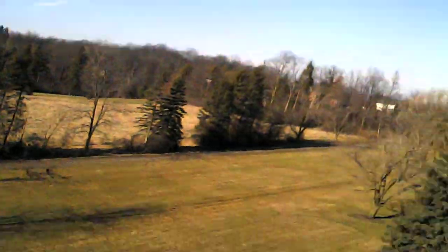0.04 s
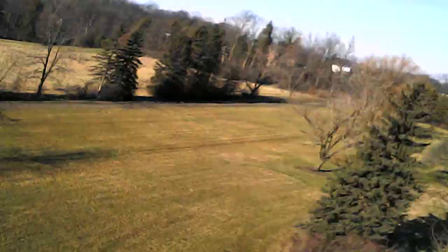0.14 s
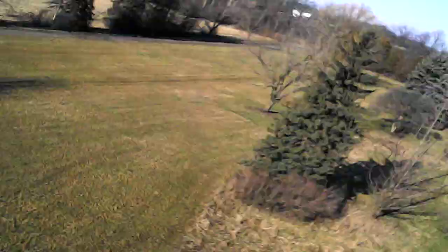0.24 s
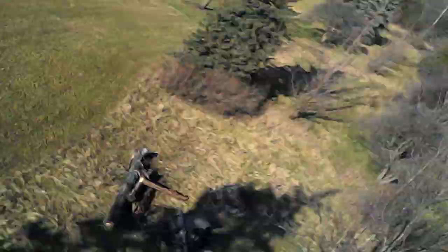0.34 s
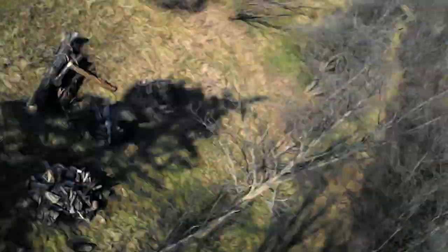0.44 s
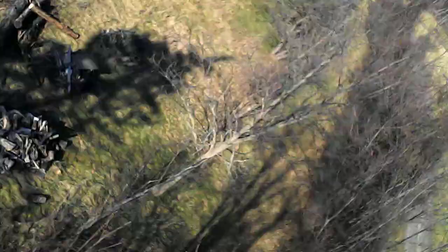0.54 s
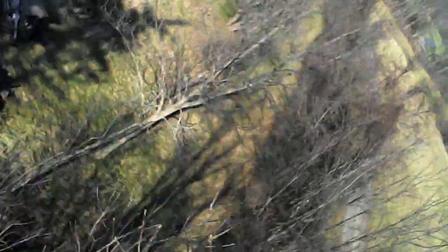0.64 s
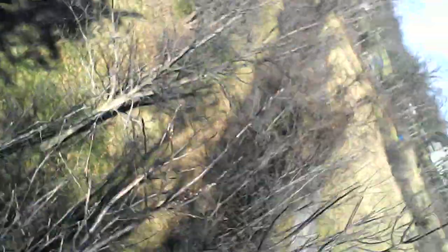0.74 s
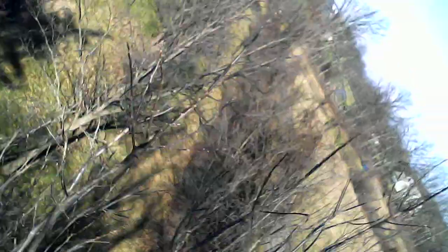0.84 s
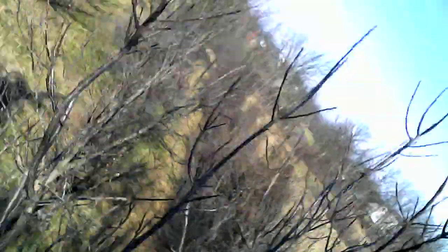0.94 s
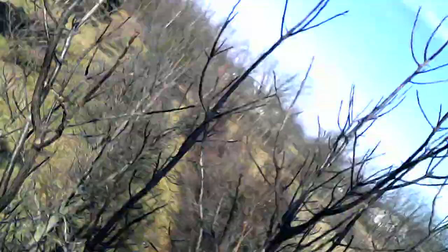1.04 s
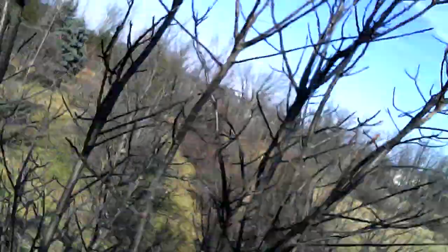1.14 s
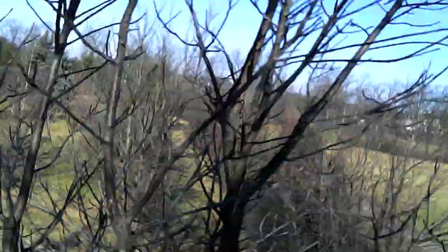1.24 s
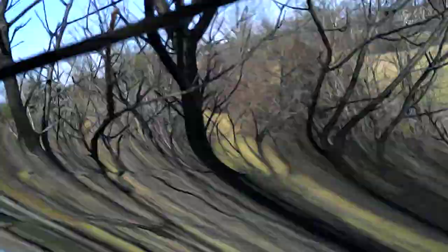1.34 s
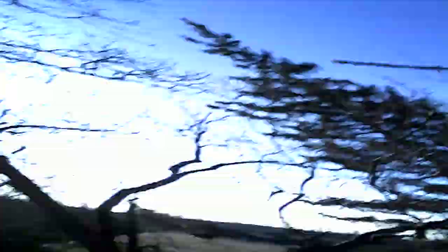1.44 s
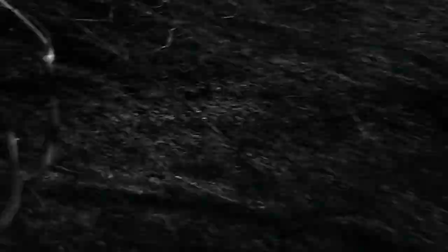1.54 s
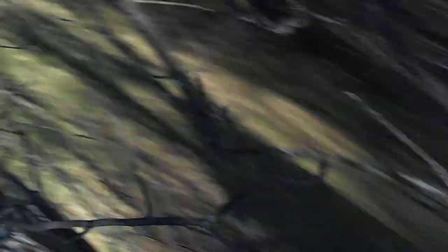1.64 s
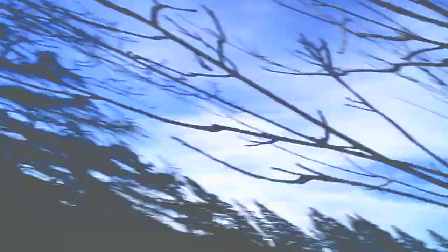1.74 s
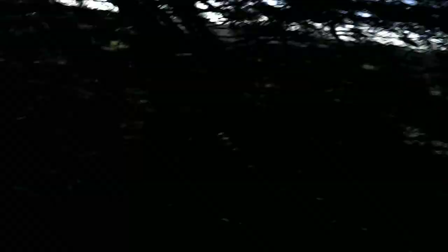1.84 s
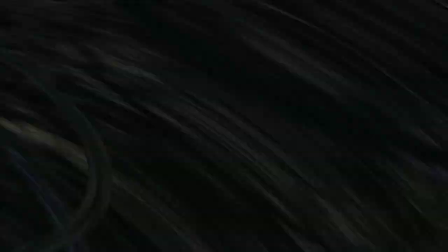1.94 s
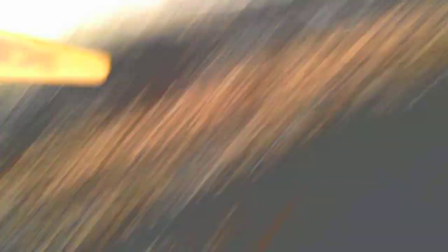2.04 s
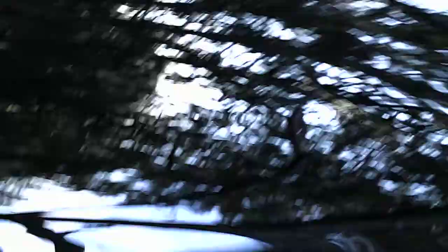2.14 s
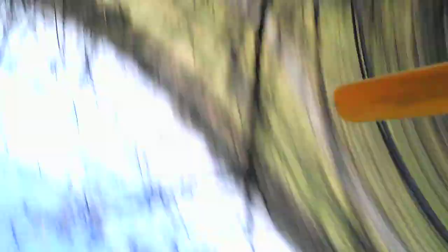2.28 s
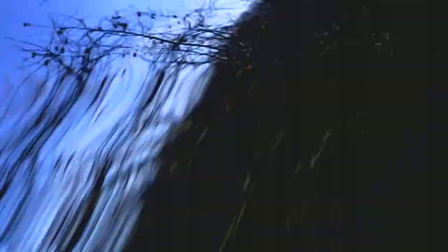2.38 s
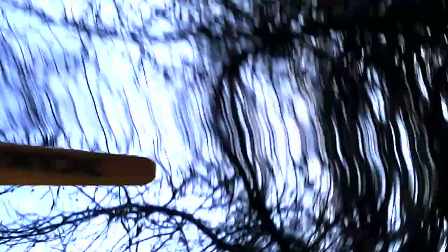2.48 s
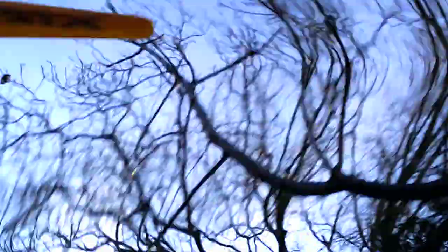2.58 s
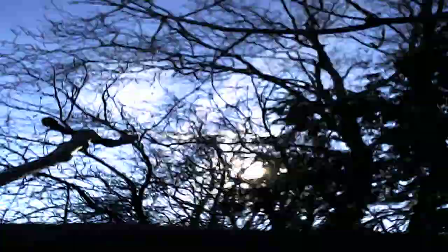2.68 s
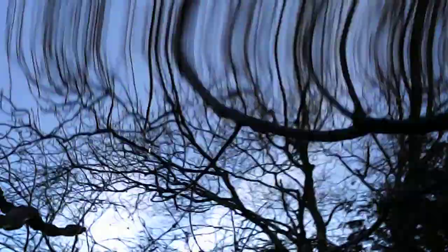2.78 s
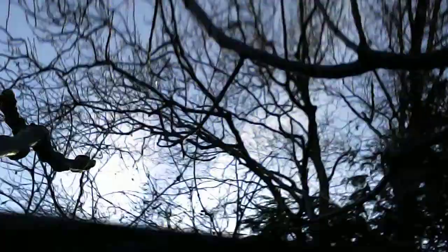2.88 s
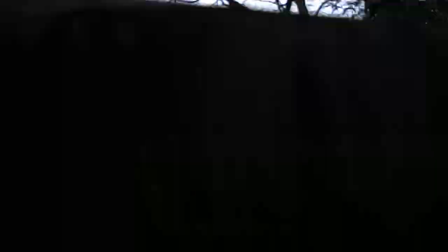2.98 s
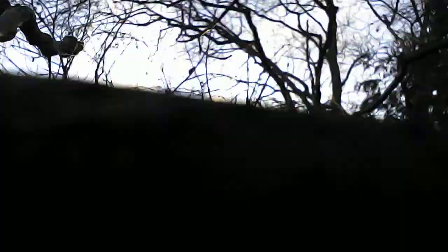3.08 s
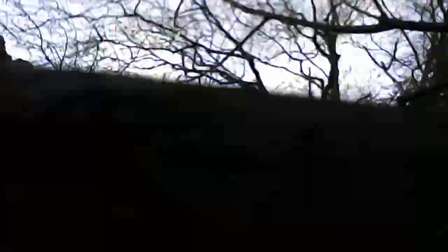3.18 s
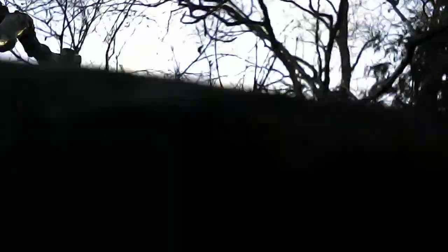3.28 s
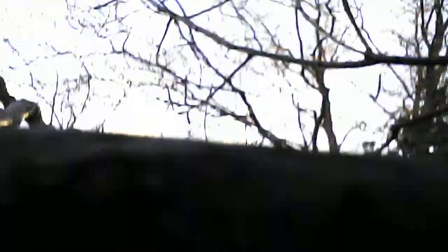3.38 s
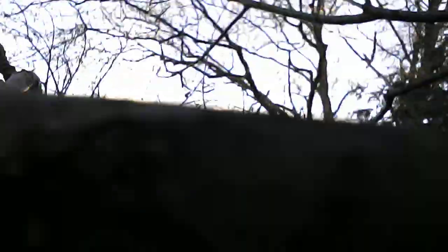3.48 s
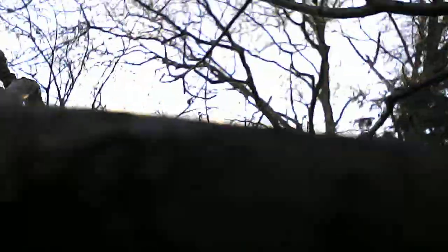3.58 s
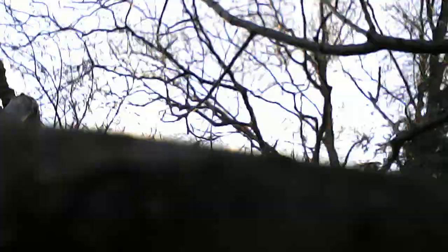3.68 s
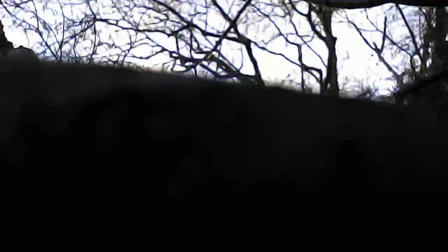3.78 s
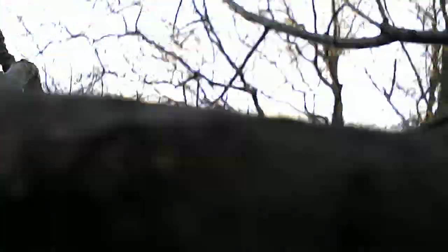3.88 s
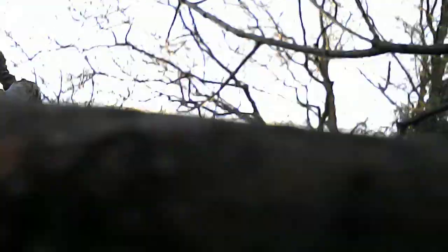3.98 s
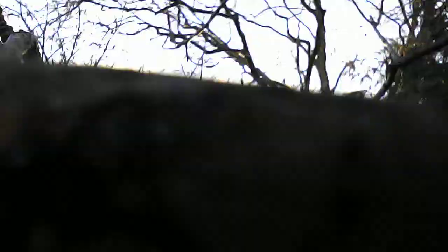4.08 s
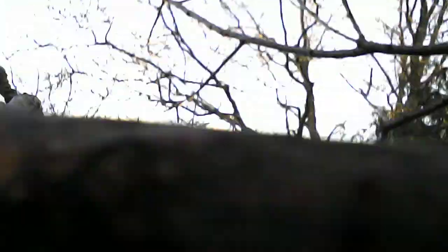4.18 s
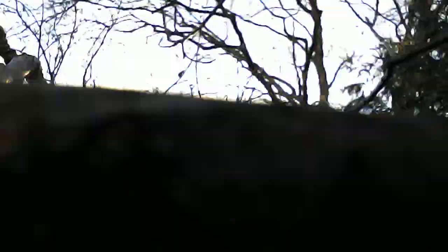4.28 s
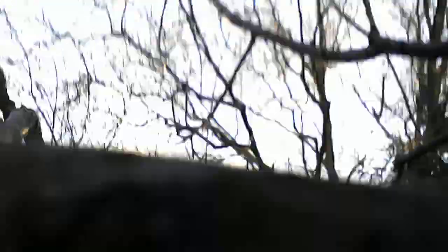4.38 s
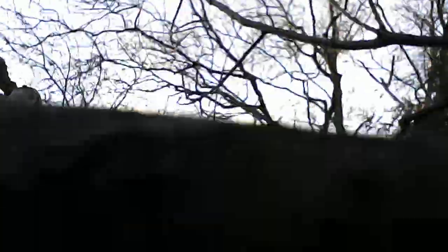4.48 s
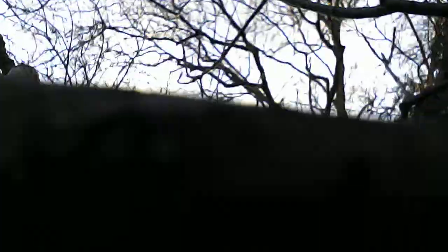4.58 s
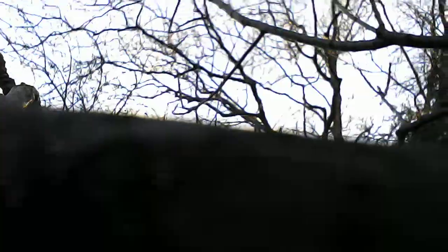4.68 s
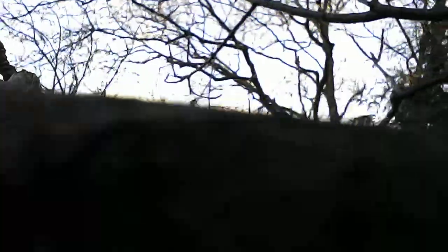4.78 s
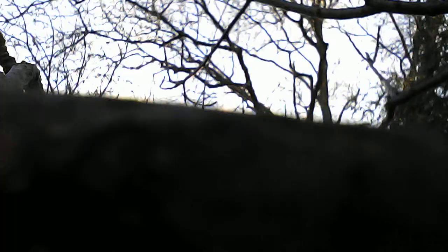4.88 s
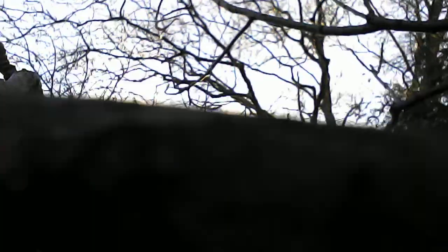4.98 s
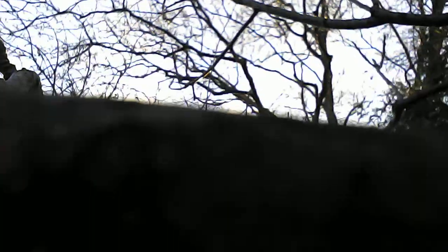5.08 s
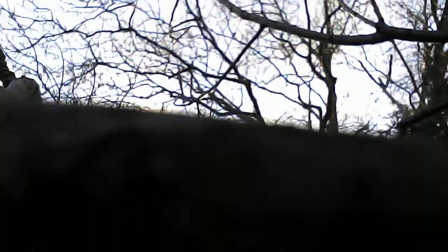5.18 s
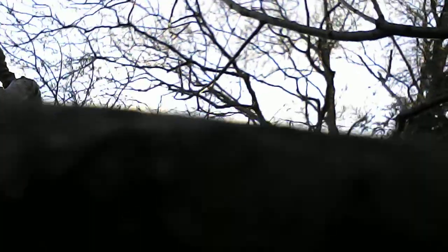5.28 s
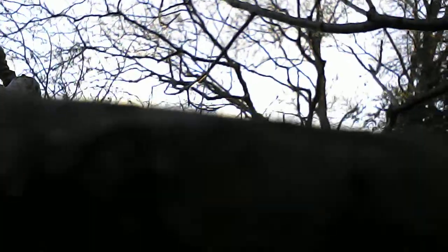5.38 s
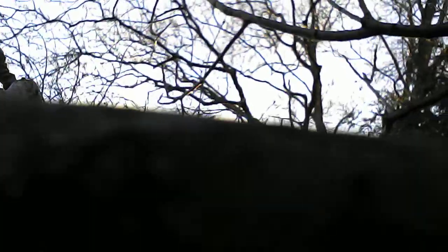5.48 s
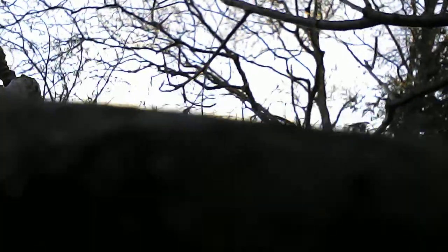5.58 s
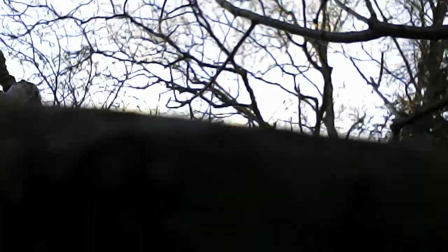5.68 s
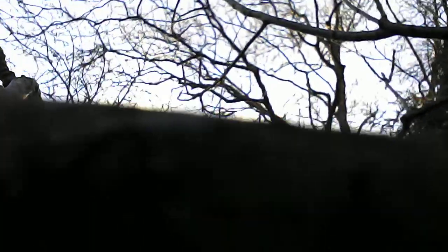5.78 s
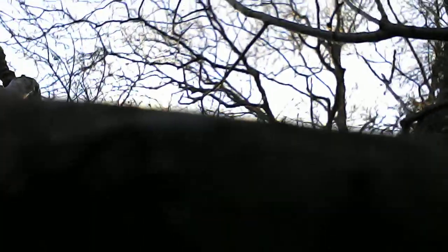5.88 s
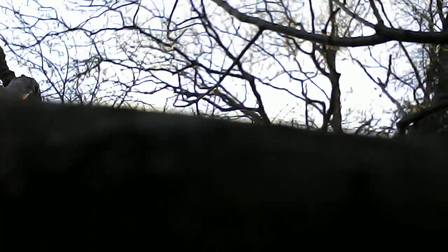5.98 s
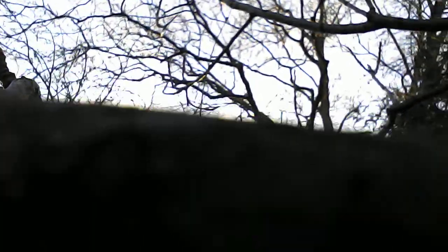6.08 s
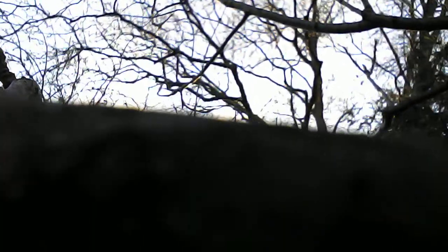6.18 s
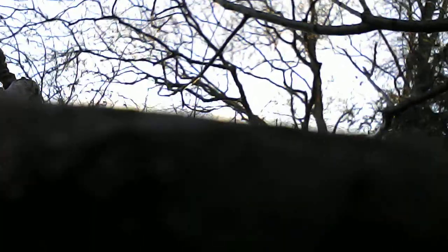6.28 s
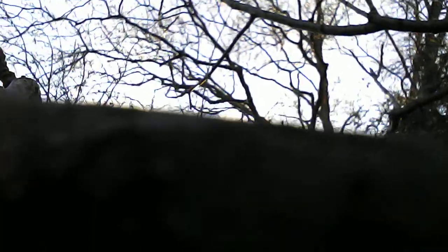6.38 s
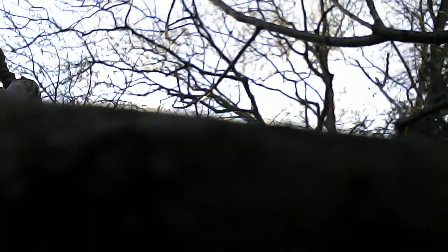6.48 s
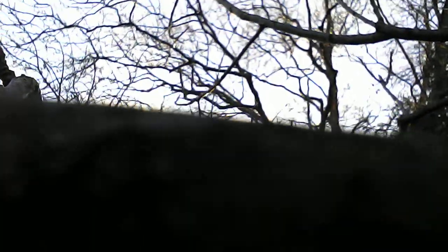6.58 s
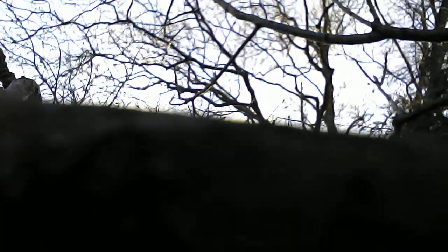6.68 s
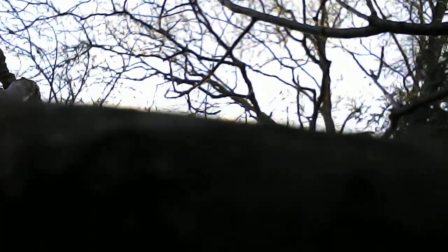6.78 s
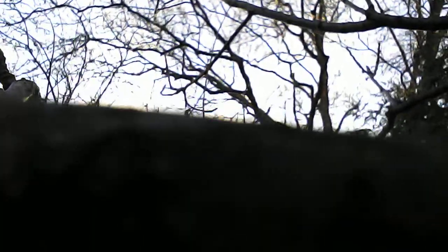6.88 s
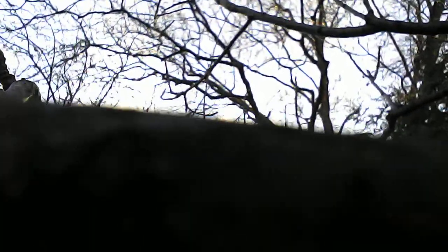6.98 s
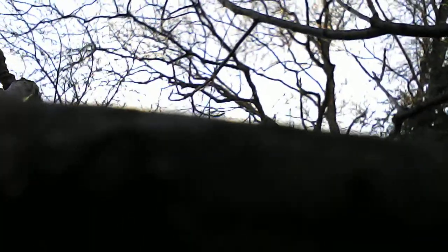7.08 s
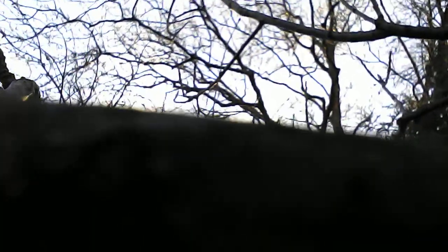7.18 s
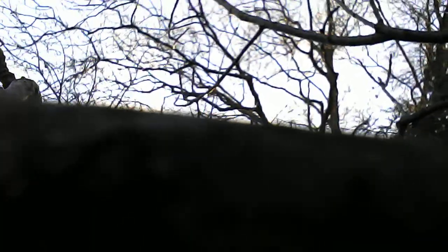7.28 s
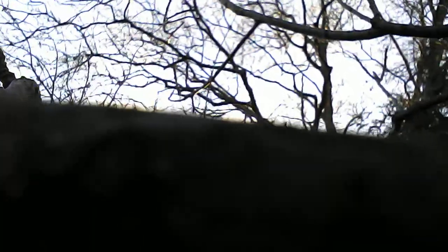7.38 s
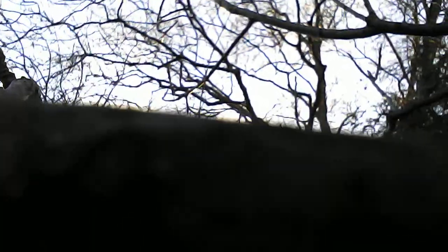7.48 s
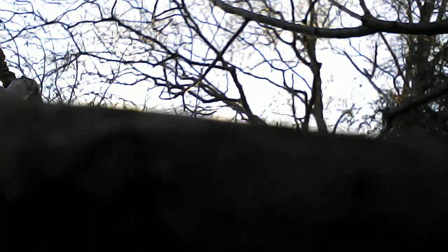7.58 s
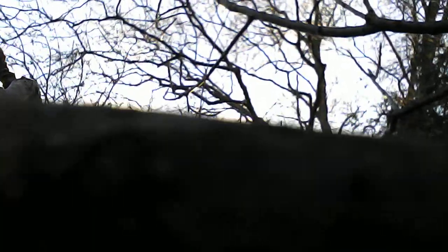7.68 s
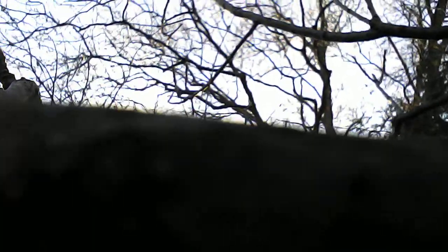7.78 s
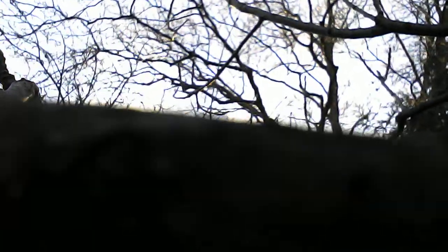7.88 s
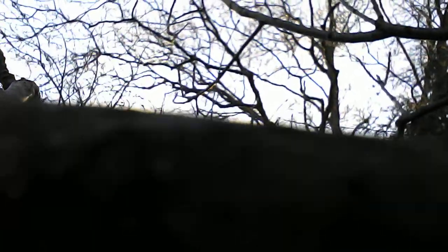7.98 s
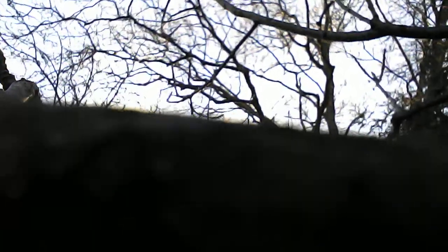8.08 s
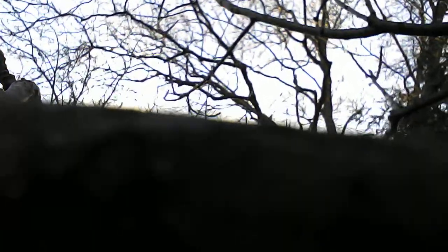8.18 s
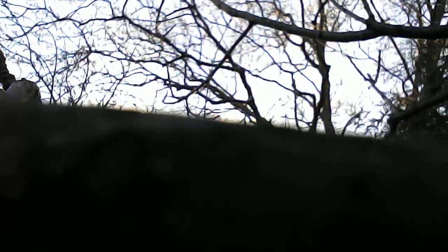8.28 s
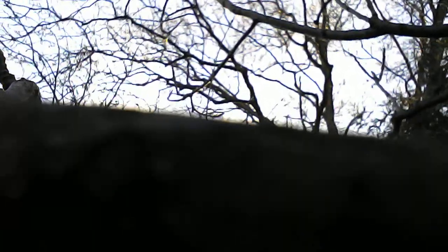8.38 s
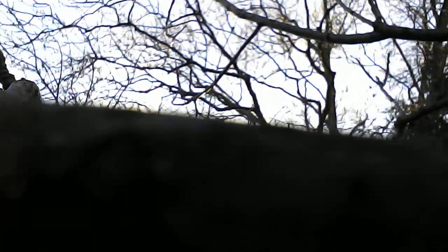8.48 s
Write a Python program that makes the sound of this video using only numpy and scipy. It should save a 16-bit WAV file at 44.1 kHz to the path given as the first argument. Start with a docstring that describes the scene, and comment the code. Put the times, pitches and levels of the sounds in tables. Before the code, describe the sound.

Close, overloaded, dull-sounding wind noise with airy hiss comes first, dips, then returns as a roar with sharp pops. A dense run of crunching scrapes, rattles and heavy knocks strikes the light craft carrying the microphone. The blows grow sparser and softer; wind stops. Afterwards only a steady low electronic flutter, buzz and hiss remain, with thin steady tones and a tiny alternating whistle.

```python
"""In gusty air and a bare tree: a small quadcopter falls in, scrapes and bangs down the branches and settles.
The microphone rides on the craft, so wind noise, cavities singing in the airstream and blows on the frame reach
it at no distance, and it is overdriven and clips. Wind and contacts are noise through resonances.
Hiss, buzz and a thin whine run throughout; on the ground the stalled electronics throb in the microphone supply."""
import sys
import numpy as np
from scipy.fft import rfft, irfft, next_fast_len
from scipy.io import wavfile
from scipy.ndimage import map_coordinates

SR = 44100
rng = np.random.default_rng(int(sys.argv[2]) if len(sys.argv) > 2 else 0)


def transcribe(u):
    """Save the signal u as a 16-bit wav file named by the first command-line argument.

    u: samples, shape (n,) or (channels, n), limited to [-1, 1]; the rate is SR.
    q: integer samples, one column per channel.
    """
    v = np.clip(np.atleast_2d(u).T, -1, 1)
    q = np.round(v * 32767).astype(np.int16)
    wavfile.write(sys.argv[1], SR, q)


N = 376613
T = np.arange(N) / SR  # seconds


def amp(db):
    """dB to gain."""
    return 10 ** (np.asarray(db) / 20)


def unit(x):
    """Scaled to rms 1."""
    return x / np.sqrt(np.mean(x ** 2) + 1e-20)


def curves(rows):
    """One value per sample for each column after the time."""
    s, *cols = np.transpose(rows)
    return [np.interp(T, s, c) for c in cols]


def wobble(rate):
    """A smooth random curve, rate knots a second."""
    knots = rng.standard_normal(int(N * rate / SR) + 4)
    return map_coordinates(knots, [T * rate])


def filtered(x, response):
    """x times a complex response of frequency."""
    m = next_fast_len(N + SR // 2)
    return irfft(rfft(x, m) * response(np.fft.rfftfreq(m, 1 / SR)), m)[:N]


def noise(points):
    """Noise of rms 1 with (Hz, dB) points on a log axis."""
    f, db = np.transpose(points)

    def spectrum(hz):
        return amp(np.interp(np.log(hz + 1), np.log(f), db))
    return unit(filtered(rng.standard_normal(N), spectrum))


def modes(table):
    """A causal sum of resonances (Hz, width Hz, dB) of alternating sign."""
    def response(f):
        return sum((-1) ** k * amp(db) * 1j * f * width / (hz * hz - f * f + 1j * f * width)
                   for k, (hz, width, db) in enumerate(table))
    return response


def pole(hz):
    """A one-pole low-pass."""
    return lambda f: 1 / (1 + 1j * f / hz)


def gate(start, length, edge):
    """1 from start for length seconds, with smooth edges."""
    return (np.tanh((T - start) / edge) - np.tanh((T - start - length) / edge)) / 2


def impulses(times, sizes):
    """Single-sample blows."""
    return np.bincount((times * SR).astype(int), sizes, N)[:N]


def wavering(x, table, depth_db, rate):
    """x through a table of resonances, each swelling and fading at random."""
    skirt_widths = 6.2  # a resonance falls away steeply this many widths off its centre
    out = np.zeros(N)
    for k, (hz, width, db) in enumerate(table):
        peak, skirt = modes([(hz, width, db)]), modes([(hz, skirt_widths * width, 0)])
        swelling = x * amp(depth_db * wobble(rate))
        out += (-1) ** k * filtered(swelling, lambda f: peak(f) * skirt(f))
    return out


# Electronic hiss under everything. Each row: frequency in Hz, spectral density in relative dB.
HISS = [(100, -28), (190, 4), (300, -5), (600, -9.5), (1100, -13.5), (2000, -21.5), (3500, -29),
        (6000, -32), (10000, -33)]
# Thin steady tones in the electronics. Each row: frequency in Hz, rms level in dB before the preamp.
WHINE = [(1024.4, -55), (2048.7, -60), (3073, -68), (4097, -86.5)]
# Supply kicks, heard on the ground. Each row: time in seconds, regular kicks and stray kicks in relative dB.
SUPPLY_KICKS = [(3.4, -23.5, -16.5), (3.8, -21.5, -17.5), (4.3, -20.5, -18), (5, -20, -20.5),
                (5.5, -20, -19), (6.1, -18, -21.5), (6.6, -19, -20.5), (7.5, -21, -18.5),
                (8.5, -17.5, -23.5)]


def electronics():
    """Load steps kick the supply: up and down once a cycle, stray ones between, a thin buzz, whine and hiss."""
    throb_hz, buzz_hz = 26.0, 78.8
    swing_share, jitter_s = .5, .002  # pure part of the throb, timing scatter of its kicks
    throb_waver_db = 1.5  # random waver of the regular kicks
    regular_db, stray_db = curves(SUPPLY_KICKS)
    cycle = np.arange(int(5.5 * throb_hz)) / throb_hz
    luck = rng.standard_normal((len(cycle), 4))
    ups = impulses(3.1846 + cycle + jitter_s * luck[:, 0], amp(2.0 * luck[:, 1]))
    downs = impulses(3.1992 + cycle + jitter_s * luck[:, 2], -.8 * amp(1.8 * luck[:, 3]))
    struck = rng.random(N) < 90 / SR  # about 90 stray kicks a second, of either sign
    stray = rng.choice([-1, 1], N) * amp(2.6 * rng.standard_normal(N)) * struck

    def sag(f):
        """How the supply gives way and recovers after a kick."""
        low = pole(hz=30)(f) * pole(hz=70)(f)
        return low * (0.5 * pole(hz=160)(f) + 2.7) * (1 - pole(hz=12)(f))

    swing = np.cos(2 * np.pi * throb_hz * (T - 4.413))
    regular = unit(filtered(ups + downs, sag)) + swing_share * swing
    throb = amp(regular_db + throb_waver_db * wobble(11)) * unit((T > 3.2) * regular)
    thumps = amp(stray_db) * unit(filtered(stray, sag))
    ticks = impulses(np.arange(int(N / SR * buzz_hz)) / buzz_hz, None)
    buzz = amp(-48.5) * unit(filtered(ticks, lambda f: pole(hz=1200)(f) ** 2 * (1 - pole(hz=400)(f))))
    whine = sum(np.sqrt(2) * amp(db) * np.sin(2 * np.pi * hz * T) for hz, db in WHINE)
    hiss = amp(-37.0 + 2.16 * wobble(120)) * noise(HISS)
    return gate(3.25, N, edge=0.027) * (throb + thumps) + buzz + whine + hiss


def whistle():
    """A faint regulator tone, one wavering pitch in flight; on the ground it hops as a lamp goes on and off."""
    flight_hz, lit_hz, dark_hz = 8950, 8850, 7250
    blink_s = .3245  # one lamp cycle
    blinks = (T - 6.118) / blink_s
    lamp_on = blinks % 1 < .5
    landed = T > 3
    dark = landed & ~lamp_on
    hz = np.where(landed, np.where(lamp_on, lit_hz, dark_hz), flight_hz)
    hz = hz + np.where(landed, 70, 25) * wobble(70) + np.where(dark, 190, 130) * wobble(400)
    hz = hz - landed * 180 * np.cos(2 * np.pi * blinks) ** 24  # droops at each hop
    level_db = np.where(dark, -57.5, -52) + 2.0 * wobble(50)
    return amp(level_db) * np.sin(2 * np.pi * np.cumsum(hz) / SR)


# Wind turbulence at the microphone port. Each row: frequency in Hz, spectral density in relative dB.
BUFFET = [(3, -27.5), (6, -11), (33, 0.5), (70, -4), (140, -11.5), (210, -16), (400, -24.5), (800, -33),
          (2000, -64.5)]
# Body cavities that the rush sings in. Each row: centre in Hz, width in Hz, relative level in dB.
CAVITIES = [(345, 70, -1.5), (755, 370, -18), (1334, 213, -4.5), (1920, 173, -6.5), (2600, 285, -11.5),
            (3600, 740, -21.5), (4340, 620, -22), (5600, 280, -42)]
# Gusts on the microphone port. Each row: time in seconds, buffet level in dB before its random waver.
GUSTS = [(0.0, -8.5), (0.27, -8.5), (.45, -12.5), (0.6, -16), (.75, -12.5), (0.93, -2.5), (1.15, -4.5),
         (1.41, -3), (1.48, -12.5), (1.66, -2.5), (1.82, 7), (1.86, 3.5), (1.98, 6), (2.04, -4),
         (2.12, -10), (2.38, -18), (2.44, -4), (2.6, -6.5), (2.75, -9), (2.92, -8.5), (3.05, -20.5),
         (3.15, -12.5), (3.3, -19.5), (3.5, -75)]
# Air streaming past the body until the tree stops it. Each row: time in seconds, rush in relative dB,
# extra treble above 3.5 kHz in dB, extra drive of the lowest cavity in dB.
RUSH = [(0.0, -9.5, 13.5, 8.5), (.06, -12.5, 13, 4), (.11, -14.5, 13.5, 4), (.15, -15, 14, 0),
        (.2, -16, 11.5, 5.5), (0.27, -18, 13.5, 4), (.31, -18, 9.5, -2.5), (0.36, -17.5, 5, -4),
        (.41, -19.5, 0, 8), (0.47, -21.5, -10, 12.5), (.5, -29.5, -16, 6), (.55, -32.5, -21, 5),
        (0.63, -34.5, -33, -1), (.79, -28, -16, -5), (0.92, -25, -14, 18.5), (1.0, -18.5, -13, 8),
        (1.05, -20, -11, 9), (1.11, -12, -7, -4.5), (1.16, -15, 1.5, 0), (1.2, -13, 4.5, 6),
        (1.23, -15.5, 6, 7), (1.26, -10.5, 4, 2.5), (1.285, -11, 7.5, 4), (1.31, -4, -8, -0.5),
        (1.36, -13, -9, 10), (1.39, -18.5, 8.5, 5), (1.44, -22, 4, 9), (1.47, -16.5, -2.5, 7),
        (1.52, -17, -2.5, 0.5), (1.58, -16, 0.5, 7.5), (1.66, -13, 0, 7.5), (1.76, -19.5, 16, 2)]


def airflow():
    """Turbulence buffets the port, and air streaming past the body sings in its cavities."""
    waver_db, wavers_per_s = 2, 28  # each cavity catches the stream on its own
    buffet_db, = curves(GUSTS)
    rush_db, tilt_db, lowest_db = curves(RUSH)
    buffet = amp(buffet_db + 1.9 * wobble(14)) * noise(BUFFET)
    stream = rng.standard_normal(N)
    lowest = wavering(stream * amp(lowest_db), CAVITIES[:1], waver_db, wavers_per_s)
    upper = wavering(stream, CAVITIES[1:], waver_db, wavers_per_s)
    open_air = amp(-30) * filtered(stream, pole(hz=3930))
    sung = unit(lowest - upper + open_air)
    treble = filtered(sung, lambda f: 1 - pole(hz=3500)(f))
    rush = amp(rush_db + 0.41 * wobble(60.3)) * (sung + (amp(tilt_db) - 1) * treble)
    return buffet + (T < RUSH[-1][0]) * rush


# Brief pressure shoves on the microphone. Each row: start in seconds, length in seconds,
# signed relative strength.
SHOVES = [(0.336, 0.045, 0.18), (0.375, 0.011, -0.92), (0.496, 0.0093, 0.3), (0.748, 0.005, 1),
          (0.888, 0.0076, 0.92), (1.077, 0.0078, 0.91), (1.22, 0.0046, -0.8), (1.379, 0.0094, 0.53),
          (1.403, 0.0058, -0.6), (1.415, .004, -1.6), (1.535, 0.011, 0.85), (1.559, 0.012, -0.5),
          (1.643, 0.0043, -3), (1.656, 0.0041, 2.4), (1.704, 0.0029, -1.3), (1.751, 0.0069, -0.7),
          (1.788, 0.06, -0.27), (1.817, 0.023, 1), (1.855, 0.038, -0.46), (1.866, 0.013, 0.8),
          (1.882, 0.01, 0.75), (1.943, 0.0136, -0.94), (1.961, 0.013, 0.8), (1.981, 0.0072, 0.96),
          (1.994, 0.0045, 2.5), (1.997, 0.0019, -2.5), (2.004, 0.019, 0.75), (2.022, 0.0072, .8),
          (2.327, 0.0056, 1.08), (2.438, 0.0068, 0.98)]


def shoves():
    """Short pushes of air pressure lean on the microphone and can pin it at one end of its swing."""
    return sum(side * gate(s, length, edge=0.002) for s, length, side in SHOVES)


# Brief squeaks and rings of the body. Each row: start in seconds, length in seconds, start pitch in Hz,
# end pitch in Hz, relative peak level in dB.
SQUEAKS = [(1.389, 0.049, 2950, 2730, -13.5), (1.454, 0.023, 1400, 1240, -19),
           (1.492, 0.037, 1950, 1980, -23), (1.571, 0.017, 2740, 2900, -20), (2.603, .012, 1400, 1380, -3),
           (2.63, 0.0082, 3300, 3200, -6), (2.639, 0.012, 1930, 1850, -3)]


def squeaks():
    """Short breathy tones of the body that swell and fade while sliding in pitch."""
    out, quiver_hz, flutter_db = np.zeros(N), 60 * wobble(300), 2.5 * wobble(150)
    for s, length, start_hz, end_hz, db in SQUEAKS:
        span = slice(round(s * SR), round((s + length) * SR))
        u = (T[span] - s) / length  # 0 to 1 through the squeak
        hz = start_hz + (end_hz - start_hz) * u + quiver_hz[span]
        tone = np.sin(2 * np.pi * np.cumsum(hz) / SR)
        out[span] += amp(db + flutter_db[span]) * np.sin(np.pi * u) * tone
    return out


# Plastic case around the microphone. Each row: centre in Hz, width in Hz, relative level in dB.
CASE = [(1303, 187, -2), (2022, 205, 1.5), (2490, 505, -9), (3260, 125, -8)]
# Arms and battery. Each row: centre in Hz, width in Hz, relative level in dB.
FRAME = [(111.5, 52, 2), (190, 36.3, 2.5), (251.3, 52, 3), (424, 350, -13), (535, 104, -22),
         (940, 520, -20)]
# Lid that answers each bump. Each row: centre in Hz, width in Hz, relative level in dB.
PANEL = [(790, 290, -11.5)]
# Last bumps in the twigs. Each row: time in seconds, click in relative dB, thud in dB above the click,
# lowest case mode in dB above the click.
KNOCKS = [(3.0182, -13, 1.5, -19), (3.046, -35, 2, -9), (3.0705, -10.5, 3, -10), (3.097, -24.5, 8, -1),
          (3.124, -23, -5, -3), (3.1354, -25.5, 11, 16.5), (3.1435, -3.5, 3, -13), (3.223, -29, 16, 13.5),
          (3.2649, -25.5, 4, 14), (3.2797, -11, 2.5, -10), (3.295, -9.5, 11.5, 5), (3.31, -18, -11, -10),
          (3.3209, -25, 3, -6), (3.3455, -21.5, 4, -4), (3.4173, -25, 5.5, -15), (3.474, -33.5, 16.5, 13),
          (3.596, -16.5, -0.5, -4), (3.6246, -25.5, 14, 1), (3.653, -29, 6, -2), (3.695, -13.5, 5, -10),
          (3.7115, -30, 19, 12), (3.8599, -17, -2, -20), (4.0877, -12.5, 1, -14), (4.1011, -25.5, 4, -12),
          (4.145, -26.5, -16, -5), (4.286, -22.5, 8.5, 4), (4.3126, -17.5, 9, 8), (4.332, -17, 4, -15),
          (4.345, -29, 13, -8), (4.406, -33, 5, -7), (4.872, -32, 14, 16.5), (4.8889, -26, 7, -5),
          (5.6385, -39.5, 21.5, 5)]


def knocks():
    """Each bump is a short dying chatter on the case and a soft push on the frame."""
    chatter_drive_db, push_drive_db = 19, 43.5  # drive that the resonances need to reach a row's level
    chatter_t60_s = 0.017
    linger_db, linger_t60_s = -25, 0.073  # loose parts rattle on after a bump
    shudder_db, shudder_t60_s = 10, 0.19  # the frame shudders on after a bump
    t = np.arange(SR // 5) / SR
    dying = amp(-60 * t / chatter_t60_s) + amp(linger_db - 60 * t / linger_t60_s)
    strike = dying * (1 - np.exp(-t / 0.00025))
    on_lowest, on_upper, on_frame = np.zeros((3, N))
    for s, db, thud_db, lowest_db in KNOCKS:
        span = slice(round(s * SR), round(s * SR) + len(t))
        burst = amp(db + chatter_drive_db) * strike * rng.standard_normal((2, len(t)))
        on_lowest[span] += amp(lowest_db) * burst[0]
        on_upper[span] += burst[1]
        shudder = amp(db + thud_db + shudder_db - 60 * t / shudder_t60_s)
        on_frame[span] += shudder * rng.standard_normal(len(t))
    s, click_db, thud_db = np.transpose(KNOCKS)[:3]
    blows = impulses(s + 0.00052, -amp(click_db + thud_db + push_drive_db))
    pushes = filtered(filtered(blows, pole(hz=750)), modes(FRAME))
    lowest = filtered(on_lowest, lambda f: modes(CASE[:1])(f) * pole(hz=2400)(f) ** 2)
    upper = filtered(on_upper, lambda f: modes(CASE[1:])(f) * pole(hz=6000)(f) ** 2)
    lid = filtered(on_lowest, modes(PANEL))
    return lowest + lid + upper + pushes + filtered(on_frame, modes(FRAME[1:3]))


# Branches dragged over the frame. Each row: start in seconds, length in seconds, rattle in relative dB,
# thud in relative dB, lowest case mode in dB above the rattle.
SCRAPES = [(1.295, 0.013, -2.5, 9, 2), (1.308, 0.018, -4, 10.5, 6), (1.326, 0.031, -12, -1.5, 1.5),
           (1.767, 0.02, -3.5, 11, -1), (1.789, 0.045, -2.5, 9.5, -1), (1.841, 0.025, -14.5, 2, 14),
           (1.872, 0.018, -5.5, 1, 7.5), (1.899, 0.052, 2.5, 12, 4.5), (1.956, 0.0092, 0.5, 12, 10.5),
           (1.973, 0.012, 1.5, 7, 4.5), (2.037, 0.027, -31, -12, 0), (2.058, 0.025, -1.5, 10, 1.5),
           (2.09, 0.036, -23, -13, -2), (2.109, 0.043, 1, 10, 0.5), (2.159, 0.0084, -12, -3, -9),
           (2.166, 0.017, -14.5, -9, -10), (2.18, 0.015, -28, -19, -7), (2.254, 0.0072, -13.5, 0.5, 11),
           (2.267, 0.036, 0.5, 11, 2), (2.309, 0.024, -7, 8, 5.5), (2.341, 0.0099, -5, 12, -2),
           (2.348, 0.016, -27, -8.5, 0), (2.407, 0.005, -22, -7, -2), (2.414, 0.007, -15, -5, -1),
           (2.425, 0.018, -12.5, 4, 8), (2.439, 0.027, -16, 2.5, 14), (2.472, 0.017, -16, -2, 0),
           (2.487, 0.0083, -10, -1.5, -6.5), (2.51, 0.0098, -6, 7.5, -3), (2.527, 0.011, -1, 1.5, 0),
           (2.536, 0.015, -14.5, -1.5, -1), (2.55, 0.0092, -11, 6.5, 7), (2.568, 0.0048, -20, 1, 15),
           (2.574, 0.016, -10.5, 0.5, 9), (2.593, 0.0069, -18, 1, 14), (2.604, 0.01, -24, -7, 19),
           (2.62, 0.014, -9, -1.5, 12.5), (2.642, 0.016, -5.5, 0, -6), (2.66, 0.016, -16, 4, -13),
           (2.688, 0.013, -9, 1.5, 2.5), (2.703, 0.013, -6, 2, -2), (2.717, 0.0081, -36, -5, -4),
           (2.755, 0.012, -40, -17.5, -12), (2.785, 0.0048, -9, -14, -16), (2.796, 0.013, -10.5, 1, -1),
           (2.811, 0.016, -25, -3, 0), (2.886, 0.014, -14.5, 1, -16), (2.906, 0.0072, -10, -5, 0),
           (2.857, .008, -33, -14, 6), (2.87, 0.0098, -19, -16, -2), (2.934, 0.0062, -20, -3, 5.5),
           (2.942, .006, -14, -7, -8), (2.952, 0.0059, -22, -8, -5), (2.965, 0.037, -41, -17.5, -5),
           (3.076, .05, -31, -16.5, -4), (3.156, 0.046, -41, -19.5, 6), (3.66, .032, -38, -28, -15),
           (4.339, 0.02, -41, -21, -4)]


def drags(column_db, edge, fade_db_per_s):
    """Force of the scrapes: each contact bites at once and weakens until it lets go."""
    bite_db, bite_s = 2.5, 0.00072  # extra force as a branch first strikes
    force, lead = np.zeros(N), .01  # the smooth edge begins within this lead, in seconds
    for (start, length, *_), db in zip(SCRAPES, column_db):
        t = np.arange(round((length + 2 * lead) * SR)) / SR - lead
        since = np.clip(t, 0, length)
        held = (np.tanh(t / edge) - np.tanh((t - length) / edge)) / 2
        level_db = db + bite_db * np.exp(-since / bite_s) - fade_db_per_s * since
        force[round((start - lead) * SR):][:len(t)] += held * amp(level_db)
    return force


# The craft rocks in the twigs, less and less overall. Each row: time in seconds, frame in relative dB,
# case in relative dB.
SETTLE = [(2.0, -18, -26.5), (2.3, -29, -38.5), (2.5, -22, -29), (2.75, -34, -31), (2.9, -25.5, -31),
          (3.2, -35, -47), (3.4, -35.5, -51), (3.65, -37, -51.5), (3.9, -38, -57), (4.3, -40, -50.5),
          (4.6, -39, -54), (5.8, -37, -65.5)]


def crash():
    """Twigs chatter over the case in dense grains while limbs shake the frame; between them the craft rocks."""
    rattle_fade, thud_fade = 130, 180.5  # dB per second, as a branch slips off while it drags
    # the point of contact wanders, so each case mode swells on its own
    shift_db, shifts_per_s = 3.5, 50
    rattle_db, thud_db, lowest_db = np.transpose(SCRAPES)[2:]
    rattle = drags(rattle_db, 0.00052, rattle_fade)
    lowest = drags(rattle_db + lowest_db, 0.00052, rattle_fade)
    thud = drags(thud_db, 0.0016, thud_fade)
    frame_db, case_db = curves(SETTLE)
    awake = (T > SETTLE[0][0]) * amp(-40 * np.clip(T - 5.7, 0, 1))
    rocking = awake * amp(case_db)
    grains = rng.standard_normal(N) * amp(5.4 * wobble(350))
    grains = grains / np.std(filtered(grains, modes(CASE)))
    shakes = rng.standard_normal(N) * amp(5.0 * wobble(90))
    shakes = shakes / np.std(filtered(shakes, modes(FRAME)))
    rung_lowest = wavering(grains * (lowest + rocking), CASE[:1], shift_db, shifts_per_s)
    rung_upper = wavering(grains * (rattle + rocking), CASE[1:], shift_db, shifts_per_s)
    scratch = filtered(grains * rattle, lambda f: amp(-18.5) * pole(hz=3000)(f) * (1 - pole(hz=600)(f)))
    low = filtered(shakes * (thud + awake * amp(frame_db)), modes(FRAME))
    return rung_lowest - rung_upper + scratch + low


def scene():
    """Everything reaches one microphone; a shove overrides wind, squeaks and scrapes."""
    shove = shoves()
    room_left = np.clip(1 - .88 * np.abs(shove), 0, 1)
    shaken = (airflow() + squeaks() + crash()) * room_left
    return (shaken + amp(1.0) * shove + knocks() + electronics() + whistle())[None]


def record(dry):
    """The preamp clips, the input stage dulls the treble, and nothing stays above the band limit."""
    clip_top, hardness, top_hz = .7, 13, 16000
    clipped = dry[0] / (1 + np.abs(dry[0] / clip_top) ** hardness) ** (1 / hardness)

    def input_stage(f):
        shelf = (1 + (f / 11500) ** 4) / (1 + (f / 11600) ** 20)
        return pole(hz=4200)(f) ** 3 * (shelf + amp(-43.5))
    dull = filtered(clipped, input_stage)
    return filtered(dull, lambda hz: hz < top_hz)[None]


dry = scene()
out = record(dry)
transcribe(out)
```